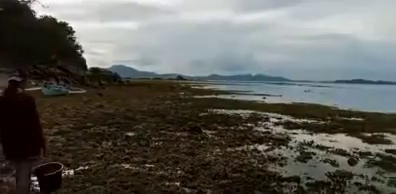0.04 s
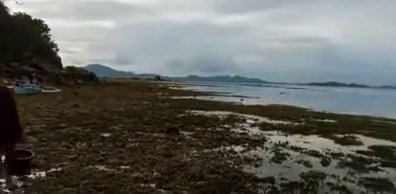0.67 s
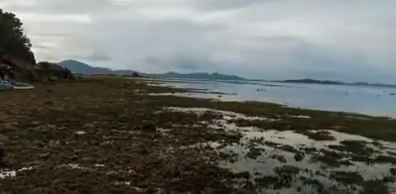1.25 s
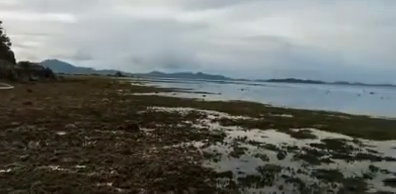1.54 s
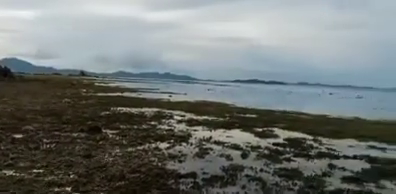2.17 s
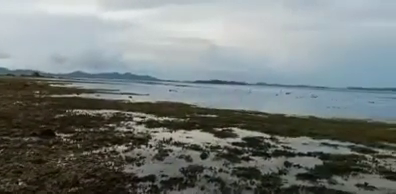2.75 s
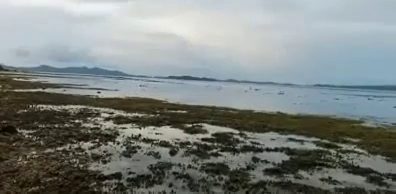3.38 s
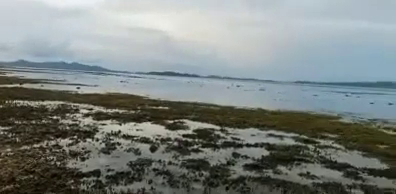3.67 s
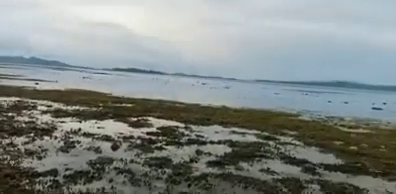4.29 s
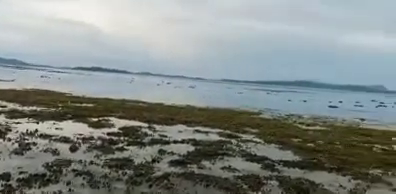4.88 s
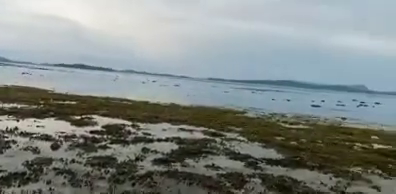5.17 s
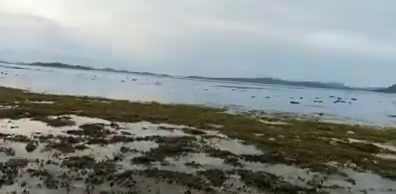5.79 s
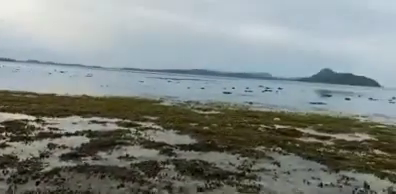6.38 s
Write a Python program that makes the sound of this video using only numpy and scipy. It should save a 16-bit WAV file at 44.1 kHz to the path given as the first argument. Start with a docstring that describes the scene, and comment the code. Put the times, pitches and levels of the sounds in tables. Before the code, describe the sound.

Faint bird whistles and chatter carry across a still tidal flat, busiest at first and then thinning. Up close, a plastic bucket knocks softly and irregular footsteps press into wet weed and rubble, with little gurgles and plops. Sharp clicks of shells stand out, the loudest about halfway through. Mud sucks briefly at a foot before a last crunch. Underneath lie a barely audible fizz and far water.

```python
"""Reef flat at low tide

A still day. Under a faint wash of far water the drained reef fizzes with bursting bubbles, while birds
whistle from the wooded shore, their notes lingering in the trees. Up front someone treads over gurgling
weed, sucking mud and coral rubble. A plastic bucket booms hollowly as it bumps; shells and shrimps snap."""
import sys
import numpy as np
from scipy import signal
from scipy.fft import rfft, irfft
from scipy.io import wavfile

SR = 44100
rng = np.random.default_rng(int(sys.argv[2]) if len(sys.argv) > 2 else 0)


def int16_out(signal):
    """Quantize to a 16-bit WAV file."""
    q = np.round(np.clip(np.atleast_2d(signal).T, -1, 1) * 32767)
    wavfile.write(sys.argv[1], SR, q.astype(np.int16))


N = 288414
TIME = np.arange(N) / SR
CUTOFF_HZ = 15900

# Tone colours of far water, reef fizz, far flock, wet weed and coral grit.
# Each row: frequency in Hz, relative level in dB.
WASH_EQ = [(20, -48), (40, -20.5), (85, 1), (210, -3.5), (500, -9), (1000, -14), (1700, -17), (3200, -20),
           (5100, -23), (7300, -30.5), (9300, -27.5), (12900, -30.5), (15500, -23.5)]
FIZZ_EQ = [(600, 9), (1800, -7.5), (3000, -9), (4500, -2), (6300, 5), (7600, -0.5), (9400, 6.5),
           (10500, -4.5), (12000, -18), (15500, -8)]
FLOCK_EQ = [(1200, -4), (1650, -6), (1950, 8), (2250, 8), (2750, -9.5), (3100, -19), (4000, -61)]
SQUELCH_EQ = [(100, -36), (400, 1), (680, 8), (880, -2), (1250, -2), (1750, -0.5), (2300, 2), (2750, -9),
              (3100, -10), (5000, -15.5), (12000, -43)]
GRIT_EQ = [(600, 13.5), (1800, -14), (3000, -10), (4500, -3), (6300, 4), (7700, -3), (9400, 12), (11000, 9),
           (13000, -57), (15500, -28)]
# Fader rides for the fizz and the flock. Each row: time in seconds, relative level in dB.
FIZZ_RIDE = [(0.0, -82), (0.82, -74.5), (0.97, -98), (1.05, -66.5), (1.31, -63), (1.49, -65.5), (1.89, -64),
             (2.17, -70), (2.51, -90), (2.66, -107), (2.88, -71), (3.04, -68), (4.06, -83), (4.97, -73),
             (5.15, -72.5), (5.41, -75.5), (5.52, -69), (6.54, -70)]
FLOCK_RIDE = [(0.0, -58.5), (.48, -57.5), (.6, -62), (.76, -59), (.98, -73), (1.1, -54), (1.26, -52),
              (1.46, -67), (2.17, -81), (2.42, -61), (2.66, -101), (3.0, -72.5), (3.16, -73), (3.3, -83),
              (3.5, -75.5), (3.58, -65), (3.66, -66), (3.8, -87), (4.1, -84), (4.19, -58.5), (4.35, -70),
              (4.42, -57.5), (4.48, -75), (4.62, -78), (4.76, -64), (4.92, -67), (5.0, -80), (5.25, -87),
              (6.37, -81), (6.46, -64), (6.54, -59.5)]

# Bird call contours, in even steps through the note. Each row: pitch ratio, relative level in dB.
WHOOP_SHAPE = [(1.14, -4), (1.04, -3), (1.005, -4), (1, -5), (1, -5), (1, -6), (1.02, -6), (1.1, 0),
               (1.145, 7), (1.135, 3)]  # sags, then hooks upward
DIP_SHAPE = [(1.21, 4.5), (1.07, -0.5), (0.84, -5), (1, -2), (1.03, -0.5), (1.04, -1)]  # falls, recovers and levels out
ARCH_SHAPE = [(0.99, -8), (0.98, 1), (1, 0), (0.94, -2), (0.776, -18.5)]  # holds, then drops
DROP_SHAPE = [(1.26, -19), (1.08, -1.5), (0.88, -1.5), (0.69, -18)]  # plunges steeply
SLUR_SHAPE = [(0.939, -14), (1, 3), (1.04, -2.5)]  # climbs gently
PEEP_SHAPE = [(1.06, 3), (1.01, 9.5), (1, 7.5), (.99, -5)]  # eases down
TUT_SHAPE = [(.99, -2), (1.01, 0), (.98, -2)]  # nearly flat
MEW_SHAPE = [(.89, -6), (.97, -1), (1, 0), (.97, 0), (.9, -4)]  # rises and falls
# Calls that swell or fade.
# Each row: start in seconds, pitch in Hz, level in dB, length in seconds, swell across the call in dB.
WHOOPS = [(.058, 2286, -56.5, .12, 1), (.643, 2241, -52, 0.12, 5), (1.272, 2287, -49, 0.12, -9),
          (3.005, 2306, -56, 0.11, 0), (3.511, 2275, -57, .117, -3), (4.555, 2330, -47.5, 0.12, 0),
          (6.318, 2336, -62, 0.12, 12)]
DIPS = [(1.657, 2140, -58.5, .12, 5), (2.19, 2140, -58.5, .12, 0), (4.088, 2130, -62, .12, -10)]
# Calls with one length per kind. Each row: start in seconds, pitch in Hz, level in dB.
ARCHES = [(.282, 2915, -58), (.374, 2770, -52.5), (.985, 2890, -60), (1.392, 2900, -53.5),
          (1.928, 2840, -53.5), (2.53, 2840, -55), (4.343, 2812, -52), (4.795, 2846, -59.5),
          (4.883, 2870, -52)]
DROPS = [(1.03, 2595, -50), (1.13, 2410, -53)]
SLURS = [(1.862, 2312, -52), (2.035, 2337, -49.5)]
PEEPS = [(.513, 5070, -85), (.768, 5000, -82.5), (1.503, 4353, -65.5), (2.204, 4226, -68)]
TUTS = [(.002, 2152, -53), (.022, 2007, -53.5), (.076, 1970, -56.5), (.84, 2128, -60.5), (.892, 1968, -54),
        (1.455, 1864, -59.5), (1.997, 1928, -51), (2.595, 1900, -58.5), (2.858, 2030, -56.5)]
MEWS = [(.108, 1463, -75.5)]
# Trills of even pips. Each row: start in seconds, length in seconds, level of the first pip in dB.
TRILLS = [(1.507, .1, -59), (3.672, .4, -58)]
# A tiny bird's thin falling chips. Each row: start in seconds, level in dB.
CHIPS = [(2.166, -70.5), (2.613, -72), (2.84, -81), (3.296, -70), (3.53, -66), (3.703, -72), (3.884, -71),
         (4.138, -66.5), (4.367, -71), (4.596, -66.5), (4.826, -66), (4.953, -76)]

# Water gurgling through weed. Each row: midpoint in seconds, length in seconds, level in dB, pitch in Hz.
GURGLES = [(0.453, 0.06, -58, 1724), (3.034, 0.14, -69.5, 1347), (3.148, 0.066, -68, 1224),
           (3.49, 0.033, -72, 1360), (3.564, 0.058, -68, 1760), (3.744, 0.066, -68.5, 1650),
           (4.288, 0.081, -62.5, 1500), (4.418, 0.036, -58, 2030), (4.959, 0.048, -65, 1880),
           (5.143, 0.083, -69, 1980), (5.372, .07, -66, 2550), (5.397, 0.046, -70, 1466),
           (5.433, 0.026, -64, 1570), (5.921, 0.026, -59, 2240), (5.994, 0.063, -60.5, 3040)]
# Single bubbles leaving the mud. Each row: start in seconds, level in dB, starting pitch in Hz.
PLOPS = [(.497, -34.5, 1650), (1.2, -20.5, 998), (1.236, -28, 1650), (1.249, -28.5, 1760),
         (1.28, -27.5, 1730), (2.56, -32, 1073), (4.164, -48, 1380), (4.206, -44.5, 1400),
         (5.646, -31, 1840), (6.034, -35, 1730)]
# Resonances of the wet hollow underfoot and of the plastic bucket.
# Each row: frequency in Hz, relative level in dB, time to fade by 60 dB in seconds.
HOLLOW_MODES = [(1380, -8, 0.011), (1850, 4.5, 0.009), (2690, -2, 0.0071), (3400, -4, 0.01),
                (4200, -10, 0.0086)]
BUCKET_MODES = [(73, -16.5, 0.36), (119, -24, 0.39), (164, -10.5, 0.12), (207.5, -9.5, 0.26),
                (236, -8.5, 0.15), (266.8, -6, 0.11), (355.6, -10, 0.14), (391, -12, 0.12),
                (423, -0.5, 0.046), (501.5, -5.5, 0.077), (563, -12, 0.057), (630, -10, 0.07),
                (672, -9, 0.042), (758, -13.5, 0.038), (930, -23, .06), (1570, -18, .09)]
# Knocks on the bucket. Each row: start in seconds, relative level in dB, hardness as a low-pass in Hz.
BUMPS = [(.5, -43, 258), (.573, -35, 700), (0.631, -39.5, 450), (.728, -23, 2500), (.763, -26, 1500),
         (.877, -42, 500), (0.923, -40, 1200)]
# Footfalls in weed and rubble. Each row: peak time, rise and fall in seconds, water level in dB,
# air pocket pitch in Hz, grit level in dB, grit pitch in Hz.
TREADS = [(0.371, 0.0082, 0.012, -48.5, 1770, -54, 6500), (0.501, 0.011, 0.019, -49, 1630, -51, 4200),
          (.913, 0.016, 0.047, -57, 2040, -55.5, 6350), (1.205, 0.005, 0.024, -41.5, 1650, -47, 5200),
          (1.246, 0.038, 0.039, -45, 1360, -48, 6960), (1.292, 0.013, 0.018, -42, 1000, -41.5, 6460),
          (1.858, 0.0049, 0.025, -58, 1710, -42, 6060), (1.876, 0.013, 0.016, -44.5, 1480, -47, 7050),
          (2.455, 0.035, 0.027, -54.5, 1880, -47.5, 6900), (2.561, 0.018, 0.017, -46.5, 1590, -59.5, 6800),
          (3.03, 0.087, 0.081, -72, 1320, -65, 4930), (2.088, 0.0013, 0.011, -47.5, 479, -59, 4770),
          (3.063, 0.0028, 0.01, -90, 1420, -50.5, 5300), (3.644, 0.044, 0.039, -66.5, 1250, -59.5, 5030),
          (4.164, 0.0012, 0.016, -56, 1330, -69, 6050), (4.247, 0.003, 0.047, -55, 1310, -59, 6750),
          (4.358, 0.049, 0.026, -86, 1530, -60.5, 6100), (4.565, 0.011, 0.011, -80, 1800, -62.5, 6400),
          (4.79, 0.028, 0.031, -65, 1760, -62, 6470), (5.172, 0.28, 0.019, -81, 1960, -67.5, 3420),
          (5.41, 0.035, 0.062, -62, 1610, -69.5, 7100), (5.653, 0.0078, 0.0087, -45, 1970, -46, 3000),
          (5.735, 0.021, 0.026, -60.5, 2840, -57, 3900), (5.917, 0.011, 0.021, -54.5, 2410, -55.5, 9000),
          (5.972, 0.003, 0.057, -55.5, 2350, -61.5, 2500), (6.147, 0.012, 0.015, -50, 2140, -44, 4100),
          (6.219, 0.019, 0.027, -69, 2070, -58.5, 5960), (6.329, 0.026, 0.029, -69.5, 2350, -62.5, 3400)]
# Shells and shrimps snapping. Each row: start in seconds, peak level in dB, low and high band edges in Hz,
# main and second ring in Hz, spray against the crack in dB.
SNAPS = [(0.3688, -42, 1200, 7100, 1990, 6400, -31), (0.4933, -30, 1190, 10200, 5100, 9700, -30),
         (.501, -31.5, 1400, 7200, 3600, 1650, -35), (.881, -43, 3000, 10500, 9400, 5500, -30),
         (.911, -28, 1780, 8200, 7100, 4370, -28), (0.968, -28.5, 1510, 9900, 6000, 4730, -24),
         (1.2754, -23, 5660, 10900, 9600, 7340, -36), (1.4333, -43.5, 6500, 9700, 8000, 9450, -29),
         (1.52, -42.5, 5250, 9000, 6100, 8000, -30), (1.848, -35, 4040, 10700, 9000, 6460, -15),
         (1.883, -25.5, 2000, 10000, 6140, 8700, -13), (2.0852, -23, 385, 7300, 4570, 7000, -20),
         (2.439, -33, 3670, 10200, 5750, 8900, -23), (2.472, -33.5, 3520, 9600, 5860, 8400, -23),
         (2.9245, -22, 2020, 9600, 4770, 2320, -36), (3.1846, -52, 7940, 10500, 9500, 8400, -30),
         (3.378, -12, 2660, 8900, 7000, 4950, -19), (3.9366, -18, 5160, 8800, 7360, 5500, -46),
         (4.1655, -44.5, 604, 2300, 1420, 754, -45), (4.943, -50, 7560, 10500, 8670, 9900, -30),
         (5.463, -48, 5340, 7400, 6400, 6000, -30), (5.5973, -48, 5640, 8540, 6300, 7000, -30),
         (5.826, -50, 8500, 11000, 9600, 10200, -30), (6.143, -20.5, 2900, 13000, 10300, 4200, -12),
         (6.292, -47, 9300, 12000, 10500, 11000, -25)]


def from_db(db):
    """Decibels to gain."""
    return 10 ** (np.asarray(db) / 20)


def unit_rms(x):
    """Scale to an rms of 1."""
    return x / np.sqrt(np.mean(x ** 2) + 1e-20)


def add(track, start_s, sound):
    """Mix a sound into a track at a given time."""
    at = max(0, round(start_s * SR))
    track[at:at + len(sound)] += sound[:max(0, N - at)]


def band(x, low_hz, high_hz, order=3):
    """Band-pass a sound; rms 1."""
    sos = signal.butter(order, [low_hz, min(high_hz, .45 * SR)], "band", fs=SR, output="sos")
    return unit_rms(signal.sosfilt(sos, x))


def equalise(x, curve):
    """Colour a sound with an EQ curve; rms 1."""
    hz, db = np.transpose(curve)
    bin_hz = np.maximum(np.arange(N // 2 + 1) * SR / N, 1)
    gain = from_db(np.interp(np.log(bin_hz), np.log(hz), db))
    return unit_rms(irfft(rfft(x) * gain, N))


def drift(per_s):
    """A random wander with a spread near 1."""
    return np.interp(TIME * per_s, np.arange(4096), rng.standard_normal(4096))


def ring(x, hz, t60):
    """A resonator: a unit click sets off a decaying sine of height 1."""
    decay, step = from_db(-60 / (t60 * SR)), 2 * np.pi * hz / SR
    return signal.lfilter([0, np.sin(step)], [1, -2 * decay * np.cos(step), decay * decay], x + 1e-18)


def grains(per_s, spread_db):
    """Random tiny clicks of uneven size."""
    sizes = from_db(spread_db * np.minimum(rng.exponential(1, N), 4))
    return unit_rms((rng.random(N) < per_s / SR) * sizes * rng.choice([-1, 1], N))


def crackle(per_s, spread_db, low_hz, high_hz, cycles, count=28):
    """Bursting bubbles or grit: each grain rings for some cycles at one of many pitches."""
    clicks, pitch_index = grains(per_s, spread_db), rng.integers(0, count, N)
    pitches = np.geomspace(low_hz, high_hz, count)
    rings = (hz * ring(clicks * (pitch_index == k), hz, cycles / hz) for k, hz in enumerate(pitches))
    return unit_rms(sum(rings))


def patchy(x, depth_db, per_s, count=18):
    """Narrow bands of a sound swell and fade, each in its own time."""
    spectrum, out = rfft(x), np.zeros(N)
    bin_hz = np.arange(1, len(spectrum) + 1) * SR / N
    band_index = np.interp(np.log(bin_hz), np.log([1000, 12000]), [0, count - 1])
    for k in range(count):
        strip = irfft(spectrum * np.maximum(0, 1 - np.abs(band_index - k)), N)
        out += strip * from_db(depth_db * drift(per_s))
    return unit_rms(out)


def pressed(x, pressure):
    """Shape a texture by the pressure of a foot, with an rms near 1 at full pressure."""
    shaped = x * pressure
    return shaped * np.linalg.norm(pressure) / (np.linalg.norm(shaped) + 1e-12)


def whistle(length_s, pitch_hz, shape, edge_s=0.035):
    """A slightly unsteady bird note whose pitch and level follow a contour."""
    t = np.arange(int(length_s * SR)) / SR
    steps = np.linspace(0, length_s, len(shape))
    ratio, db = (np.interp(t, steps, column) for column in np.transpose(shape))
    hz = pitch_hz * ratio + 30 * np.interp(t * 500, np.arange(200), rng.standard_normal(200))
    edges = np.clip(np.minimum(t, length_s - t) / min(edge_s, length_s / 2), 0, 1)
    fade = np.sin(np.pi / 2 * edges) ** 2
    return np.sqrt(2) * from_db(db) * fade * np.sin(2 * np.pi * np.cumsum(hz) / SR)


def chip(hz):
    """A tiny bird's brief, slightly falling note."""
    return whistle(length_s=.029, pitch_hz=hz, shape=[(1.024, 0), (.976, 0)])


def trees(x, early_db, early_s, late_db, t60):
    """Add quick scatter off trunks and rocks, then a longer tail from the wooded slope."""
    t = TIME[:SR]
    early, late = rng.standard_normal((2, SR))
    early *= np.exp(-t / early_s)
    late *= from_db(-60 * t / t60) * (1 - np.exp(-t / 0.0073))
    echo = from_db(early_db) * early / np.linalg.norm(early)
    echo += from_db(late_db) * late / np.linalg.norm(late)
    return x + signal.fftconvolve(x, echo)[:N]


def wind(level_db=-76.5, gust_db=3.2):
    """Light air brushes the microphone in low, uneven puffs."""
    puffs = from_db(level_db + gust_db * drift(per_s=11))
    return puffs * band(rng.standard_normal(N), low_hz=45, high_hz=126, order=2)


def far_water(level_db=-69.5, waver_db=2.52):
    """The distant sea lays down a dark, wavering bed of noise."""
    return from_db(level_db + waver_db * drift(per_s=13)) * equalise(rng.standard_normal(N), WASH_EQ)


def insects(level_db=-82, waver_db=4.5):
    """A thin insect buzz: a narrow band of high noise that flickers."""
    buzz = equalise(rng.standard_normal(N), [(5000, -39), (5900, 3.5), (6450, 4.0), (7200, -52)])
    return from_db(level_db + waver_db * drift(per_s=16)) * buzz


def twitter(level_db=-82, spread_db=6, low_hz=6800, high_hz=9900, count=70):
    """Tiny far birds chip at random, each at its own pitch."""
    out = np.zeros(N)
    for when, pitch, loudness in rng.random((count, 3)):
        note = chip(low_hz + (high_hz - low_hz) * pitch)
        add(out, when * N / SR, from_db(level_db + spread_db * loudness) * note)
    return out


def flock(count=1400, spread_db=4.5, trim_db=1):
    """Many far birds slur short notes; the nearer ones stand out, the trees blur the rest to a chatter."""
    out = np.zeros(N)
    for when, pitch, bend, length, distance in rng.random((count, 5)):
        hz, slur = 1500 + 1400 * pitch, 0.249 * (bend - .5)
        note = whistle(0.018 + 0.0356 * length, hz, [(1 - slur, 0), (1, 0), (1 + slur, 0)], edge_s=0.009)
        add(out, when * N / SR, from_db(-spread_db * np.log(distance + 0.019)) * note)
    chatter = trees(out, early_db=4, early_s=0.0064, late_db=1.5, t60=0.55)
    return from_db(np.interp(TIME, *np.transpose(FLOCK_RIDE)) + trim_db) * equalise(chatter, FLOCK_EQ)


def reef_fizz(ticks_db=-12, trim_db=-3.5):
    """Tiny bubbles burst all over the draining reef, and larger ones tick out of the fizz."""
    bubbles = crackle(per_s=3500, spread_db=2.2, low_hz=2500, high_hz=14000, cycles=130, count=64)
    ticks = crackle(per_s=91, spread_db=3.5, low_hz=5130, high_hz=11000, cycles=170)
    fizz = patchy(bubbles, depth_db=4.5, per_s=25) + from_db(ticks_db) * ticks
    return from_db(np.interp(TIME, *np.transpose(FIZZ_RIDE)) + trim_db) * equalise(fizz, FIZZ_EQ)


def birds(waver_db=2.0, pip_gap_s=0.062, pip_fade_db=1.1, chip_hz=8300):
    """Whistled calls, trills and chips waver on their way across the flat and linger in the trees."""
    out = np.zeros(N)
    for calls, shape in ((WHOOPS, WHOOP_SHAPE), (DIPS, DIP_SHAPE)):
        for start, hz, db, length_s, swell_db in calls:
            note = whistle(length_s, hz, shape, edge_s=0.0061)
            add(out, start, from_db(db + swell_db * np.linspace(-.5, .5, len(note))) * note)
    for calls, shape, length_s in ((ARCHES, ARCH_SHAPE, .046), (DROPS, DROP_SHAPE, .032),
                                   (SLURS, SLUR_SHAPE, .078), (PEEPS, PEEP_SHAPE, .141),
                                   (TUTS, TUT_SHAPE, .024), (MEWS, MEW_SHAPE, .11)):
        for start, hz, db in calls:
            add(out, start, from_db(db) * whistle(length_s, hz, shape, edge_s=0.0049))
    for start, length_s, db in TRILLS:
        for k, delay in enumerate(np.arange(0, length_s, pip_gap_s)):
            pip = whistle(length_s=0.017, pitch_hz=2102, shape=TUT_SHAPE)
            add(out, start + delay, from_db(db - pip_fade_db * k) * pip)
    for start, db in CHIPS:
        add(out, start, from_db(db) * chip(chip_hz * (1 + 0.0099 * rng.standard_normal())))
    out *= from_db(waver_db * drift(per_s=350))
    return trees(out, early_db=-4.0, early_s=0.014, late_db=-9, t60=.85)


def gurgles(bubbles_per_s=540, pitch_spread=0.1, cycles=36, climb=0.069):
    """Clusters of small, like-sized bubbles swell and fade, each bubble climbing a little in pitch."""
    out, t = np.zeros(N), TIME[:SR // 25]
    for middle, length_s, db, pitch_hz in GURGLES:
        cluster = np.zeros(N)
        for when, pitch, loudness in rng.random((int(bubbles_per_s * length_s), 3)):
            hz = pitch_hz * (1 + pitch_spread * (2 * pitch - 1))
            age = t * hz / cycles
            envelope = from_db(-60 * age) * (1 - np.exp(-t * hz / 2))
            bubble = envelope * np.sin(2 * np.pi * hz * t * (1 + climb * age))
            add(cluster, middle + length_s * (when - .5), loudness * np.sin(np.pi * when) ** .5 * bubble)
        out += from_db(db) * cluster * np.sqrt(length_s * SR) / (np.linalg.norm(cluster) + 1e-12)
    return out


def plops(t60=0.022, climb=0.058, attack_s=0.0029):
    """A bubble rings briefly and climbs in pitch as it nears the surface of the mud."""
    out, t = np.zeros(N), TIME[:SR // 10]
    envelope = from_db(-60 * t / t60) * (1 - np.exp(-t / attack_s))
    for start, db, hz in PLOPS:
        add(out, start, 2 * from_db(db) * envelope * np.sin(2 * np.pi * hz * t * (1 + climb * t / t60)))
    return out


def mud_suck(start_s=5.606, last_db=-33.5, swell_db=8.5, first_gap_s=0.0064, gap_ratio=.9, count=9):
    """Air slips under a lifting foot in quickening, swelling gulps, each ringing the wet hollow."""
    out, t = np.zeros(N), TIME[:SR // 20]
    attack = 1 - np.exp(-t / 0.00071)
    for k in range(count):
        detunes = 1 + 0.058 * rng.standard_normal(len(HOLLOW_MODES))
        gulp = sum(from_db(db - 60 * t / t60) * np.sin(2 * np.pi * hz * detune * t)
                   for (hz, db, t60), detune in zip(HOLLOW_MODES, detunes))
        gain = 2 * from_db(last_db - swell_db * (1 - k / (count - 1)) ** 2)
        add(out, start_s, gain * gulp * attack)
        start_s += first_gap_s * gap_ratio ** k
    return out


def bucket(hop_s=.018, hop_loss_db=8.5, rattle_db=-39, rattle_s=0.032, shift_db=-45, shift_s=0.079):
    """Soft bumps set the hollow plastic booming while its load hops, then shifts loosely and settles."""
    blows, t = np.zeros(N), TIME[:SR // 3]
    tumbling = grains(per_s=240, spread_db=1.0)
    for start, db, hardness_hz in BUMPS:
        soften = signal.butter(2, hardness_hz, fs=SR, output="sos")
        for hop in range(3):
            rattle = from_db(rattle_db) * np.exp(-t / rattle_s) * rng.standard_normal(len(t))
            blow = signal.sosfilt(soften, (t == 0) + rattle)
            add(blows, start + hop * hop_s * rng.uniform(0.74, 1.2), from_db(db - hop_loss_db * hop) * blow)
        settling = (TIME > start) * np.exp(-np.abs(TIME - start) / shift_s)
        blows += from_db(db + shift_db) * settling * tumbling
    boom = sum((-1) ** k * from_db(db) * ring(blows, hz, t60)
               for k, (hz, db, t60) in enumerate(BUCKET_MODES))
    return from_db(-2) * signal.sosfilt(signal.butter(2, [90, 850], "band", fs=SR, output="sos"), boom)


def treads(pocket_db=-5.5, thud_db=-29, lumpy_db=1.5, settle_db=-20.5, settle_s=0.097):
    """Each tread squeezes water from weed, rings an air pocket, thuds and grinds grit that then settles."""
    squelch = crackle(per_s=2400, spread_db=3.0, low_hz=388, high_hz=4290, cycles=39)
    squelch = equalise(patchy(squelch, depth_db=3.5, per_s=55), SQUELCH_EQ)
    grit = crackle(per_s=4000, spread_db=2.8, low_hz=1800, high_hz=15000, cycles=40, count=48)
    grit = equalise(patchy(grit, depth_db=4.5, per_s=35), GRIT_EQ)
    spurts = grains(per_s=3800, spread_db=0.5)
    lumps = from_db(lumpy_db * drift(per_s=120))  # the weed gives way unevenly
    ground = band(rng.standard_normal(N), low_hz=36.7, high_hz=158)
    out = np.zeros(N)
    for peak_s, rise_s, fall_s, water_db, pocket_hz, grit_db, grit_hz in TREADS:
        span = np.abs(TIME - peak_s) < .4
        t = TIME[span] - peak_s
        pressure = lumps[span] * np.exp(-np.where(t < 0, -t / rise_s, t / fall_s))
        settling = from_db(settle_db) * (t > 0) * np.exp(-np.abs(t) / settle_s)
        pocket = from_db(pocket_db) * pressed(ring(spurts[span], pocket_hz, t60=0.021), pressure)
        # big pockets let out big, low bubbles; the size of the rubble sets the pitch of the grit
        water = band(squelch[span], 0.62 * pocket_hz, high_hz=9000, order=5)
        rubble = band(grit[span], 0.35 * grit_hz, 1.182 * grit_hz, order=4)
        out[span] += from_db(water_db) * (pressed(water, pressure) + pocket)
        out[span] += from_db(grit_db) * pressed(rubble, np.maximum(pressure, settling))
        out[span] += from_db(water_db + thud_db) * ground[span] * pressure
    return out


def snaps(t60=0.0061, scatter_db=-22, scatter_s=0.0027, tail_db=-45, tail_s=0.033, spray_s=0.00039):
    """A crack and its rebound, two brief shell tones, wet spray, a short scatter, a faint hissing tail."""
    out, t = np.zeros(N), TIME[:SR // 10]
    click = t == 0
    scatter = from_db(scatter_db) * np.exp(-t / scatter_s)
    tail = from_db(tail_db) * np.exp(-t / tail_s)
    for start, db, low_hz, high_hz, main_hz, second_hz, spray_db in SNAPS:
        crack = click + (scatter + tail) * rng.standard_normal(len(t))
        add(crack, 0.000091 * rng.uniform(0.56, 1.2), np.array([0.12]))  # the rebound
        shell = 0.17 * ring(click, main_hz, t60) + 0.078 * ring(click, second_hz, t60)
        burst = t * np.exp(-t / spray_s) * rng.standard_normal(len(t))
        spray = band(burst, low_hz=12800, high_hz=CUTOFF_HZ, order=2)
        snap = band(crack + shell, low_hz, high_hz, order=4) + from_db(spray_db) * spray
        add(out, start, from_db(db) * snap / np.abs(snap).max())
    return out


def scene():
    """Birdsong, the close action and the shore bed, mixed to mono."""
    birdsong = birds() + twitter()
    close_up = treads() + mud_suck() + gurgles() + plops() + snaps() + bucket()
    bed = reef_fizz() + flock() + insects() + far_water() + wind()
    return (birdsong + close_up + bed)[None]


def record(dry):
    """A steep low-pass takes off the very top."""
    return signal.sosfilt(signal.ellip(10, .1, 80, CUTOFF_HZ, fs=SR, output="sos"), dry)


dry = scene()
out = record(dry)
int16_out(out)
```